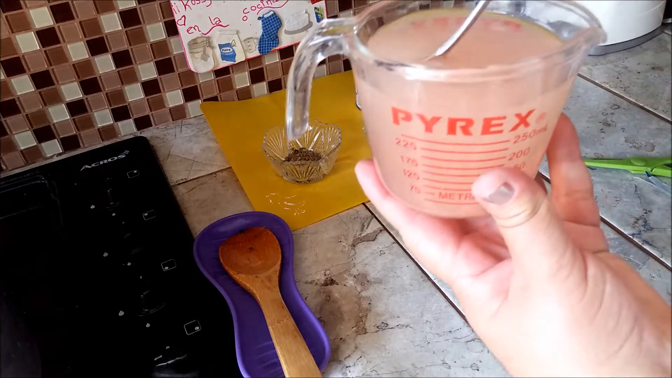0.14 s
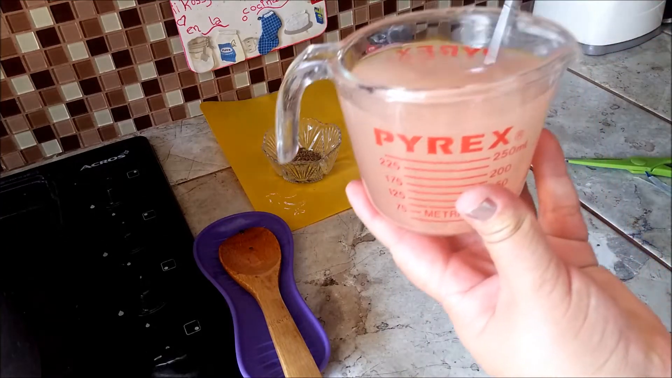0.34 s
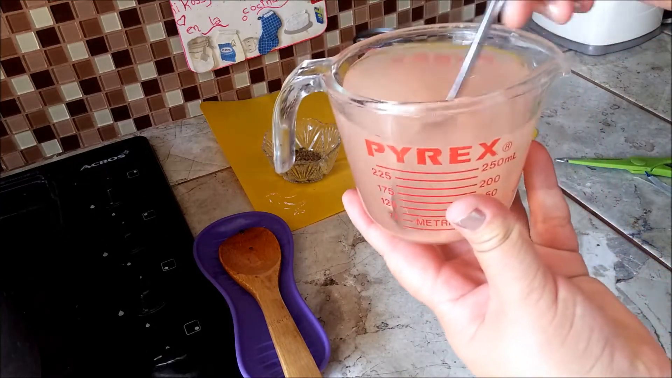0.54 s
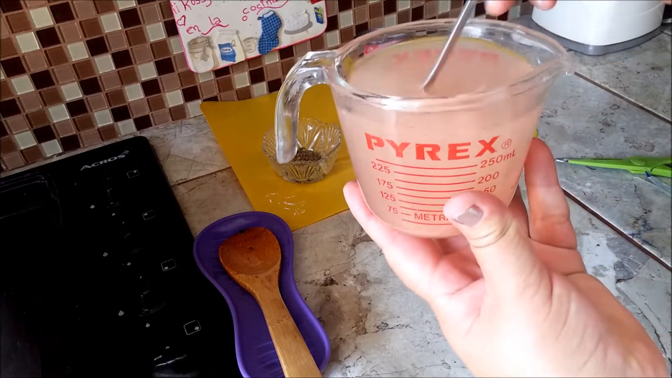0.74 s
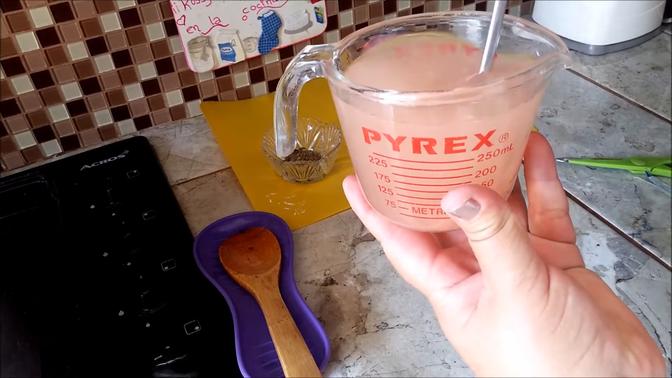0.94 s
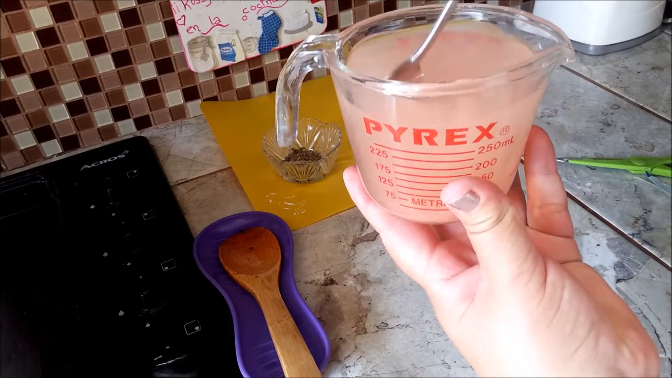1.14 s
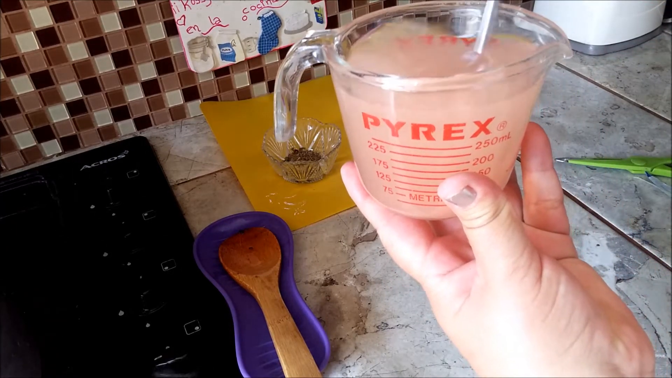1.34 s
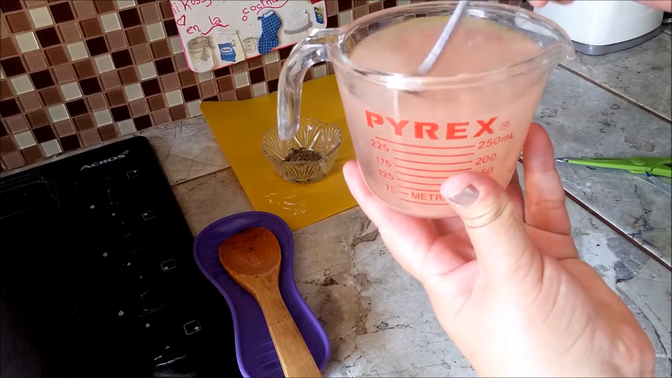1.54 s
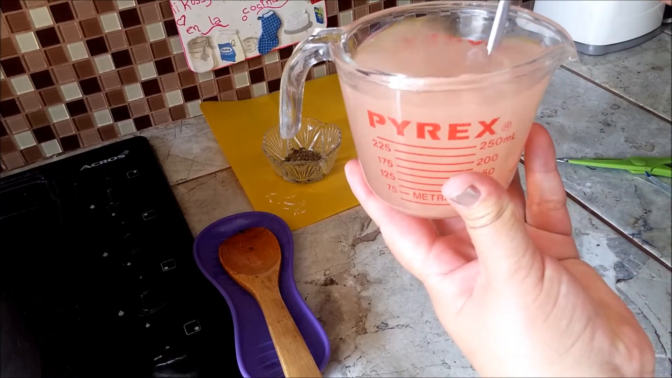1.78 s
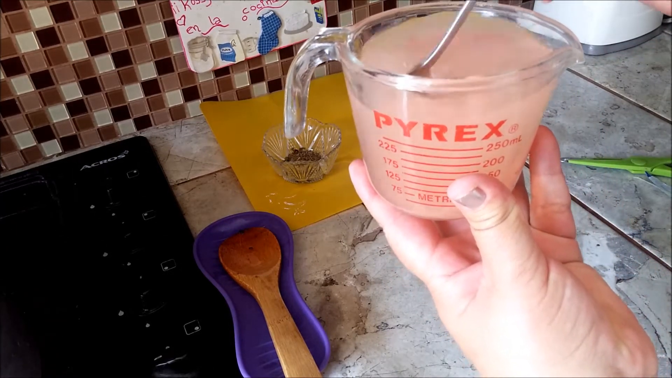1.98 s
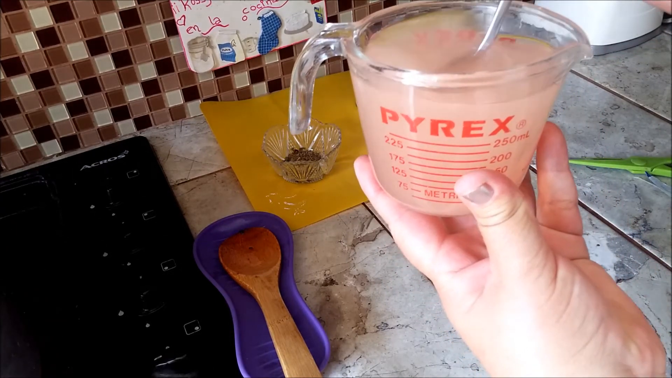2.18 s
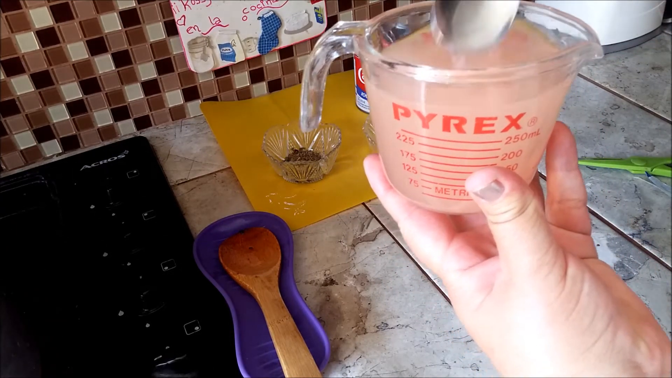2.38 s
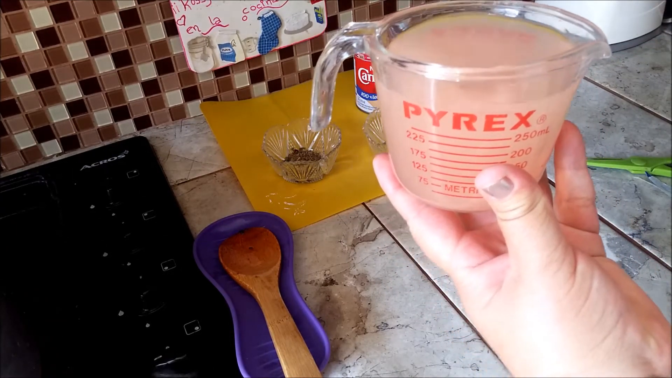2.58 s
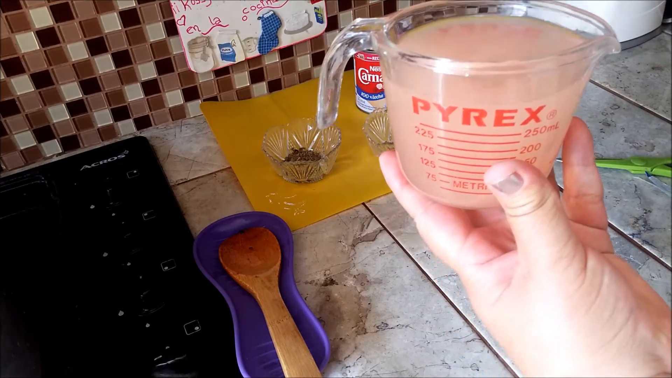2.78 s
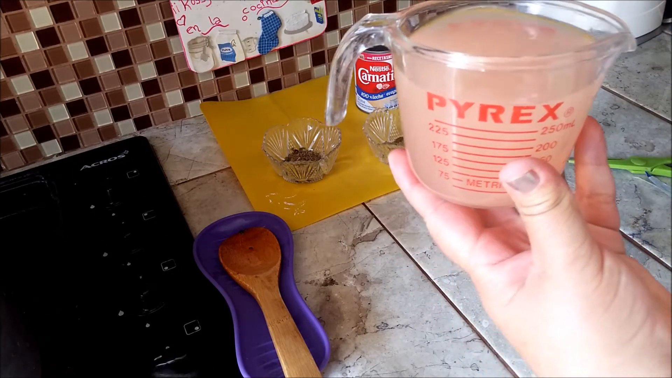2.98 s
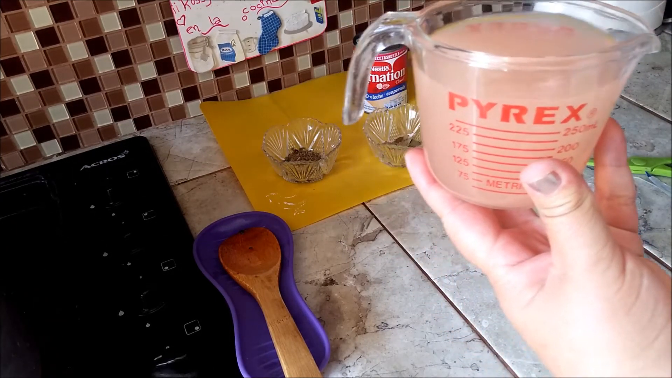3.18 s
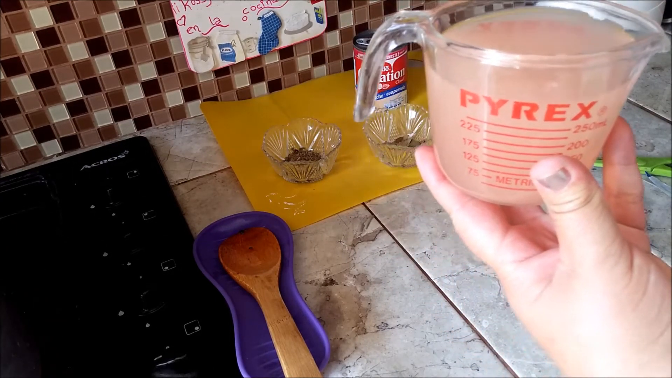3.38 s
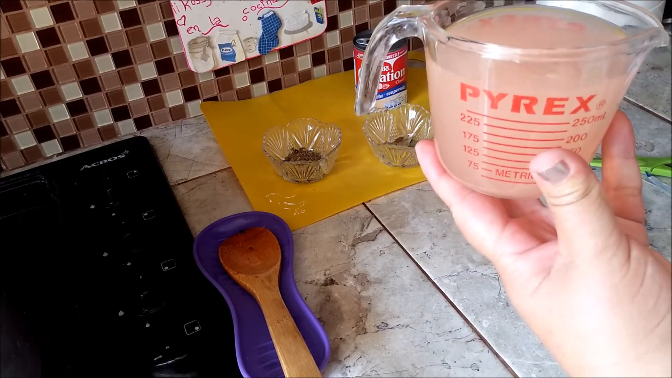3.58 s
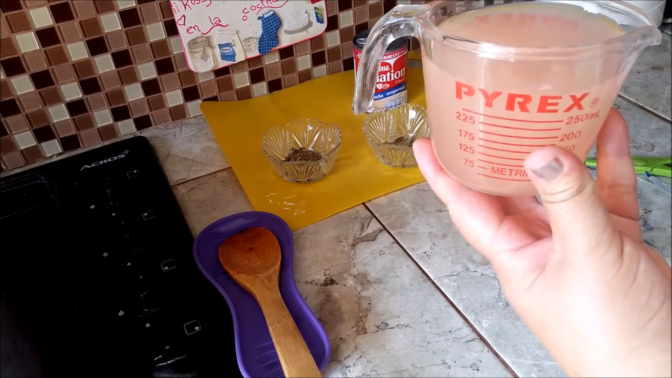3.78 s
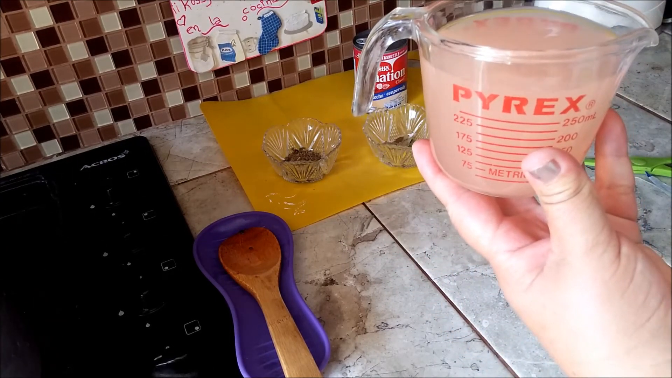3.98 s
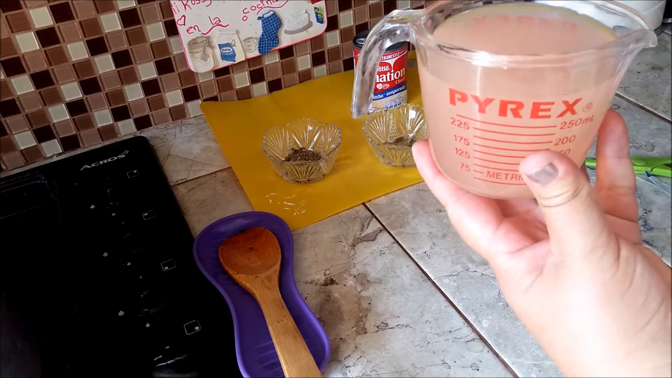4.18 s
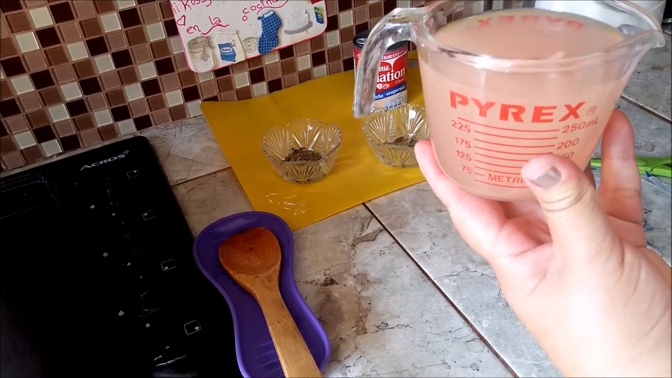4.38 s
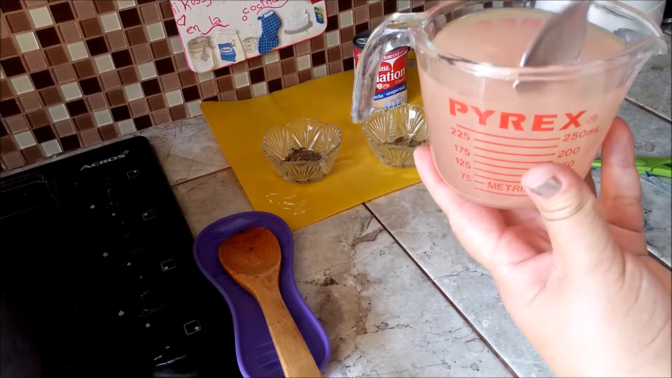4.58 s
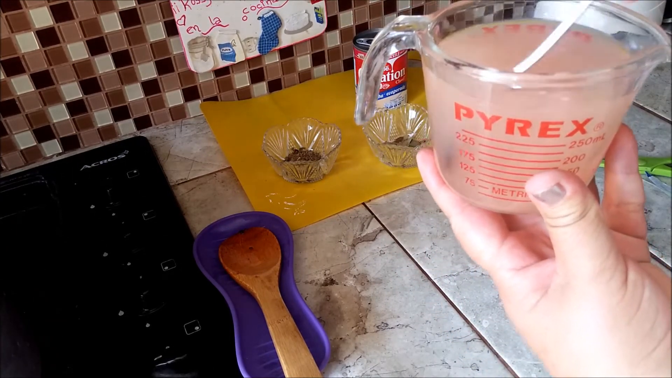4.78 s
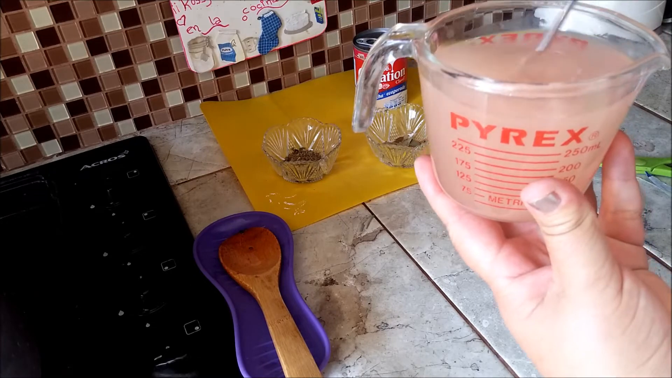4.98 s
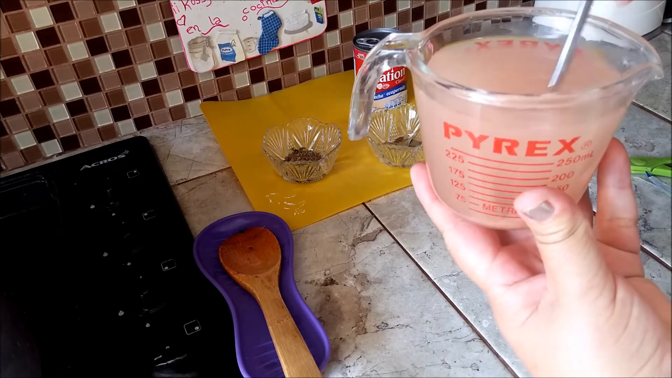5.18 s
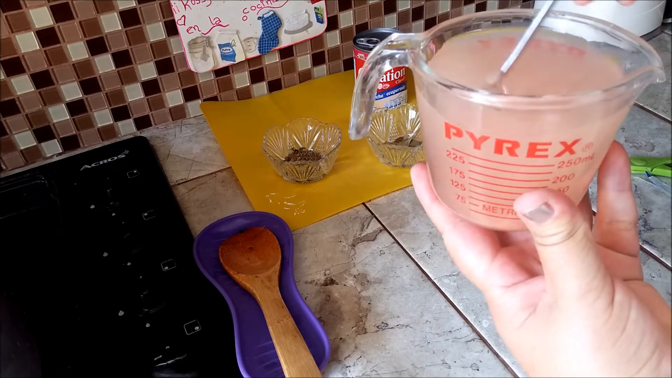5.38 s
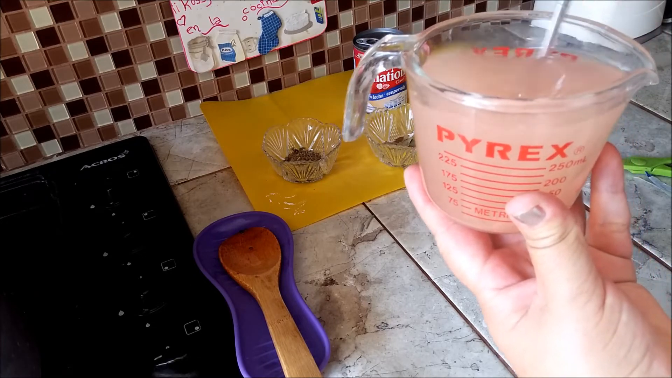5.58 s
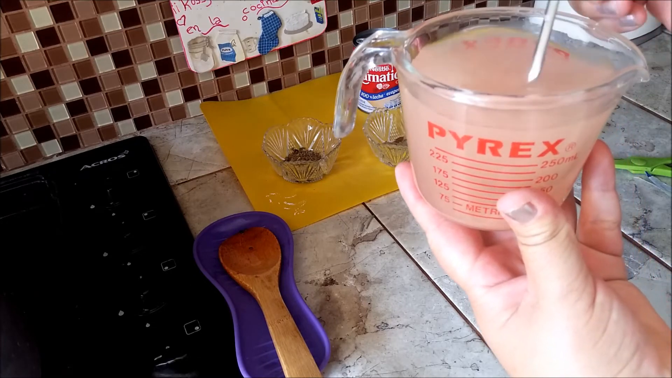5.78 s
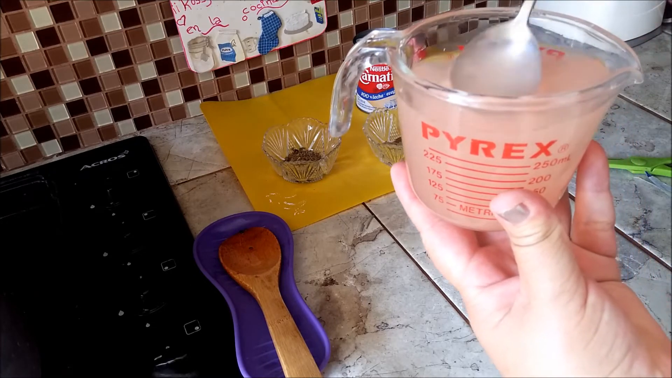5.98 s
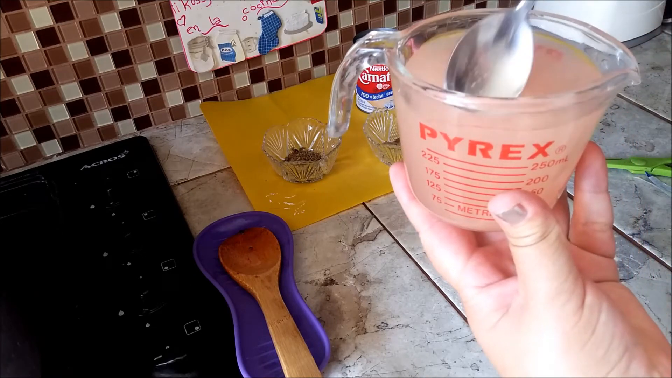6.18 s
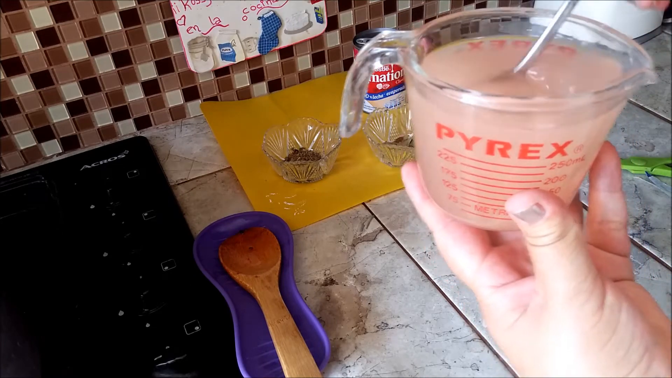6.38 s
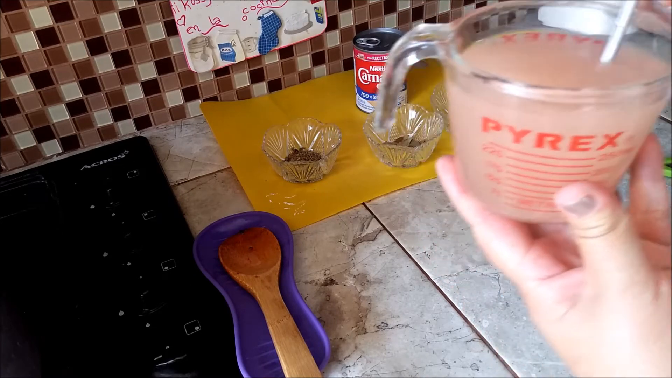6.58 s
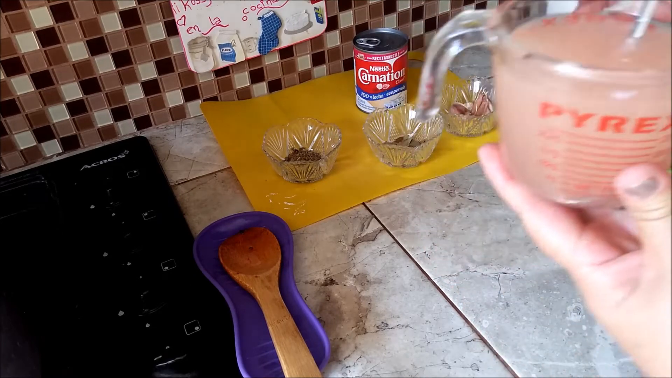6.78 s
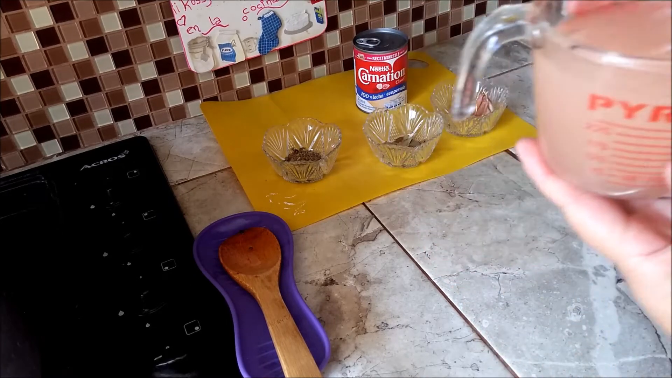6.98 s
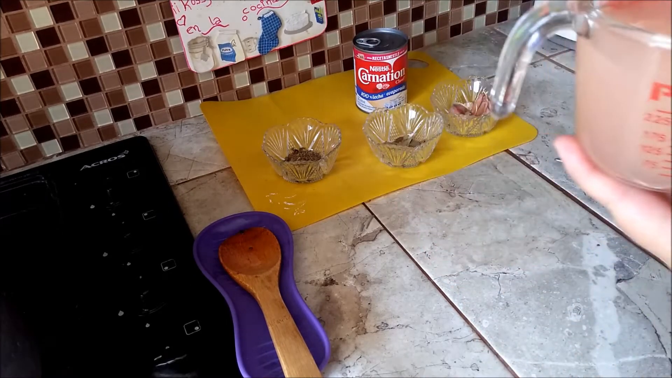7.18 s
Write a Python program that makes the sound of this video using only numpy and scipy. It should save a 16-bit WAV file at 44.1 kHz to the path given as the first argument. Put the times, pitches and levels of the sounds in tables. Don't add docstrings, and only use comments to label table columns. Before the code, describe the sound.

A hand-held glass measuring jug full of creamy liquid is stirred with a steel spoon: about a dozen lively clinks, their pitch sagging slightly as the liquid swirls. Then near quiet with small rising bubble plops, a spell of delicate tapping, another gap, and sharp handle raps on the rim. Steady fridge hum underneath, short tiled-room reflections, close microphone, sound strongly weighted to the right over a dull, hissing left side.

```python
import sys
import numpy as np
from scipy import signal
from scipy.fft import rfft, irfft
from scipy.io import wavfile

SR = 44100
rng = np.random.default_rng(int(sys.argv[2]) if len(sys.argv) > 2 else 0)


def elevation(decibels):
    levels = np.asarray(decibels, float)
    return 10 ** (levels / 20)


def wav_out(sig):
    wavfile.write(sys.argv[1], SR, np.round(np.clip(np.atleast_2d(sig).T, -1, 1) * 32767).astype(np.int16))


N = 319725


def at_time(points, s):
    return np.interp(s, *np.transpose(points))


def at_hz(points, hz):
    table_hz, value = np.transpose(points)
    return np.interp(np.log(hz + 1), np.log(table_hz), value)


def shaped(x, points):
    gain = elevation(at_hz(points, np.fft.rfftfreq(len(x), 1 / SR)))
    return irfft(rfft(x) * gain, len(x))


def bandpass(lo_hz, hi_hz):
    return signal.butter(2, [lo_hz, hi_hz], "band", fs=SR, output="sos")


def add_ring(out, s, modes, rise_s=0.00049):
    at = round(s * SR)
    for hz, db, t60 in modes:
        r, w = elevation(-60 / (t60 * SR)), 2 * np.pi * hz / SR
        blow = signal.unit_impulse(min(N - at, round(t60 * SR)))
        ring = signal.lfilter([0, elevation(db) * np.sin(w)], [1, -2 * r * np.cos(w), r * r], blow)
        out[at:at + len(blow)] += ring * (1 - np.exp(-np.arange(len(blow)) / (rise_s * SR)))


def add_crack(out, s, db, lo_hz, hi_hz, decay_s):
    at, t = round(s * SR), np.arange(3000) / SR
    burst = rng.standard_normal(3000) * np.exp(-t / decay_s) * np.clip(t / 0.00007, 0, 1)
    out[at:at + 3000] += elevation(db) * signal.sosfilt(bandpass(lo_hz, hi_hz), burst)


# [t/s, wall ring f/Hz, lower twin of the first ring level/dB]
SWIRL = [(.038, 3181, -18), (.246, 3154, -3), (.425, 3181, 3), (.563, 3162, 2), (.883, 3140, 0),
         (1.056, 3143, 6), (1.276, 3119, -8), (1.393, 3133, -8), (1.695, 3079, -8), (1.925, 3111, -6),
         (2.088, 3057, 10), (4.83, 3100, -20), (7, 3088, -20)]


def pitch(s):
    times, wall, twin = np.transpose(SWIRL)
    wall_hz = np.interp(s, times, wall)
    shift = wall_hz - 3140
    return wall_hz, 1221 + .22 * shift, 2330 + .6 * shift, np.interp(s, times, twin)


# [t/s, first ring level/dB, wall ring level/dB, dull knock level/dB, bright contact level/dB]
WALL_CLINKS = [(0.0374, -22, -10.5, -34, -22), (0.245, -29, -30.5, -28, -29.5),
               (0.4239, -30, -17, -30, -21.5), (0.562, -55, -18, -34.5, -19),
               (0.7832, -54, -54, -46, -41.5), (.882, -78, -52, -42, -40.5),
               (0.8934, -40.5, -48, -36.5, -30.5), (1.0554, -42.5, -11.5, -34, -17),
               (1.2756, -52, -13.5, -17, -21), (1.3934, -32.5, -24.5, -31, -26.5),
               (1.486, -70, -40, -47, -46), (1.6942, -49, -28, -20.5, -25.5),
               (1.7942, -37, -38, -41.5, -38.5), (1.8686, -40.5, -68, -34.5, -39),
               (1.925, -35.5, -28.5, -35, -21), (2.0881, -55.5, -24, -18, -24)]
# [t/s, first ring level/dB, wall ring level/dB, floor ring level/dB, bright contact level/dB]
FLOOR_CLINKS = [(4.8287, -39.5, -40, -74, -34), (4.8915, -41.5, -29, -35, -34),
                (5.0403, -49, -40.5, -34, -32), (5.2002, -50, -63, -54.5, -64),
                (5.263, -47, -49, -43.5, -44.5), (5.382, -61, -44, -71, -35), (5.463, -45.5, -51, -43, -39),
                (5.5995, -39, -49, -42, -34), (6.553, -52, -46, -38.5, -33.5), (6.6525, -26, -28, -30, -17),
                (6.8393, -69, -43, -55, -51), (6.9987, -55, -34.5, -72, -42.5)]


def clinks():
    on_wall = [(s, first, wall, knock, knock - 43, contact, max(0, contact - knock - 8))
               for s, first, wall, knock, contact in WALL_CLINKS]
    on_floor = [(s, first, wall, floor - 19, floor, contact, 3.0)
                for s, first, wall, floor, contact in FLOOR_CLINKS]
    return on_wall + on_floor


# [t/s, t60/s]
GRIP_T60 = [(0, 0.53), (2.2, 0.7), (4.8, 0.76), (7, 0.63)]


def wall_rings():
    out = np.zeros(N)
    beat_hz, wall_t60 = 4.2, 0.35
    for s, first, wall, _, _, _, sharp in clinks():
        wall_hz, first_hz, _, twin = pitch(s)
        grip_s = at_time(GRIP_T60, s)
        partner = wall - 12 - 4.0 * sharp
        modes = [(first_hz, first - 1, grip_s),
                 (.976 * first_hz, first + twin - 1, grip_s),
                 (wall_hz - beat_hz / 2, wall - 5, wall_t60),
                 (wall_hz + beat_hz / 2, wall - 9, wall_t60),
                 (.982 * wall_hz, wall - 22, .12),
                 (1.143 * wall_hz, partner - 2, 0.46)]
        add_ring(out, s + .0006, modes, rise_s=0.002)
    return out


def knocks():
    out, hits = np.zeros(N), clinks()
    floor_hz = 2046
    for (s, _, _, knock, floor, _, _), luck in zip(hits, rng.normal(0, 1, (len(hits), 3))):
        knock_hz, heavier = pitch(s)[2], max(knock, floor)
        modes = [(knock_hz, knock + 6, 0.051),
                 (knock_hz, knock - 20, .2),
                 (knock_hz * .975, knock - 14.5 + 3 * luck[0], .07),
                 (knock_hz * 1.035, knock - 14 + 3 * luck[1], .06),
                 (floor_hz + 15 * luck[0], floor + 5, 0.1),
                 (floor_hz - 45 + 15 * luck[1], floor - 8.5, 0.1),
                 (1420 + 60 * luck[2], heavier - 17, .05)]
        add_ring(out, s, modes)
        add_crack(out, s, heavier - 4, 600, 2850, 0.006)
    return out


# [t/s, level/dB, f/Hz]
CLACKS = [(4.8914, -40, 3050), (5.0438, -44, 3220), (5.2625, -41.5, 3620), (5.3742, -49, 3140),
          (5.3857, -25.5, 3620), (5.462, -43.5, 2810), (5.852, -50, 3640), (6.5543, -33, 3260),
          (6.6535, -19, 3390), (6.8819, -35.5, 3030), (7, -35, 3480)]


def clacks():
    out = np.zeros(N)
    on_wall = [(s, contact - 11, pitch(s)[0]) for s, *_, contact in WALL_CLINKS]
    on_damped = [(s - .0012, db, hz) for s, db, hz in CLACKS]
    for s, db, hz in on_wall + on_damped:
        add_ring(out, s, [(hz, db + 1.5, .03)])
        add_crack(out, s, db + 8, 2280, 4860, 0.0022)
    return out


# [f/Hz, level/dB, t60/s]
FOUR_KHZ = [(3960, -2, .06), (4150, -7, .13), (4270, -7, .05)]
# [f/Hz, level/dB, t60/s]
FIVE_KHZ = [(5230, 0, .045), (5060, -8, .06), (5290, -18, .15)]
# [f/Hz, level/dB, t60/s]
TICK_MODES = [(6405, -6, 0.06), (7080, -78, 0.0083), (8240, -2.5, 0.031), (9320, -3.5, 0.037),
              (10210, 4, 0.014), (10060, -2, 0.06)]
# [t/s, level/dB, airy edge level/dB]
GRAZES = [(0.9903, -42, -40), (1.1697, -46, -27), (2.7551, -40.5, -60), (3.0344, -59, -56),
          (3.11, -50.5, -57), (4.393, -55, -54), (4.596, -60, -64), (4.634, -59, -38.5), (5.3606, -52, -37),
          (5.372, -35.5, -36), (5.4394, -53, -58), (6.879, -44.5, -40)]


def contact_bursts():
    out = np.zeros(N)
    hits = [(s, contact, contact, max(knock, floor) - contact) for s, _, _, knock, floor, contact, _ in clinks()]
    hits += [(s, db, db - 20, 0) for s, db, _ in GRAZES]
    for (s, tick, body, heavy), luck in zip(hits, rng.normal(0, 1, (len(hits), 2, 12))):
        four = body - 10.5 - 0.34 * np.clip(heavy, -12, 8)
        groups = [(FOUR_KHZ, four), (FIVE_KHZ, body + 0.5), (TICK_MODES, tick + 1.8)]
        modes = [(hz, db + level, t60) for group, level in groups for hz, db, t60 in group]
        varied = [(hz * (1 + hz * 3e-6 * detune), db + 3.5 * share, t60)
                  for (hz, db, t60), detune, share in zip(modes, *luck)]
        add_ring(out, s, varied, rise_s=0.0013)
        add_crack(out, s, body + 0.82, 3780, 6400, 0.01)
        add_crack(out, s, tick + 4, 3700, 9500, 0.0064)
        add_crack(out, s, tick - 7, 5900, 20500, 0.017)
        add_crack(out, s, tick + 9, 8500, 15300, 0.0013)
    for s, _, airy in GRAZES:
        add_crack(out, s, airy + 9, 9600, 16500, 0.003)
    return out


# [t/s, stem ring level/dB, bowl ring level/dB, neck ring level/dB, tip burst level/dB]
SPOON = [(.0365, -32.5, -48, -33, -25), (.2455, -43, -61, -66, -39), (.4238, -25.5, -37, -40, -33),
         (.5623, -38.5, -44.5, -48, -20.5), (.7826, -43, -75, -70, -65), (.8929, -42, -36.5, -46, -24),
         (1.0545, -36.5, -32, -43, -17.5), (1.2755, -30.5, -48, -29, -37), (1.3933, -30, -39.5, -40, -27),
         (1.6942, -31, -49, -55, -31), (1.7948, -76, -38.5, -38, -37), (1.8684, -69, -47, -46, -57),
         (1.925, -33, -32.5, -35, -27.5), (2.0884, -23.5, -37.5, -26.5, -31),
         (4.8287, -52, -67, -56, -32.5), (4.8915, -64, -49, -50, -53), (5.0405, -50, -61, -52, -31.5),
         (5.262, -54, -66, -61, -44), (5.463, -51, -61, -52, -53), (5.5995, -51, -44, -44, -34.5),
         (6.553, -48, -66, -34.5, -28), (6.6525, -27.5, -31, -31, -40), (6.9985, -51, -53, -62, -34)]
# [t/s, f/Hz]
STEM_HZ = [(0, 1732), (2.2, 1728), (5, 1719), (6.7, 1711)]


def spoon_stem():
    out = np.zeros(N)
    for s, stem, bowl, *_ in SPOON:
        hz = at_time(STEM_HZ, s)
        add_ring(out, s + .0006, [(hz, stem - 2, 0.6), (1.204 * hz, bowl, 0.63)], rise_s=0.0027)
    return out


# [t/s, f/Hz]
TIP_HZ = [(0, 5953), (2.2, 6150), (4.8, 5690), (7, 5680)]


def spoon_tip():
    out = np.zeros(N)
    for s, _, _, neck, tip in SPOON:
        hz = at_time(TIP_HZ, s)
        modes = [(hz, tip + 4, .045), (hz * 1.01, tip - 14, .12), (1.54 * pitch(s)[0], neck + 3, 0.086)]
        add_ring(out, s, modes, rise_s=.0007)
    return out


# [t/s, low ring level/dB, upper rings level/dB]
RIM_HITS = [
    (6.554, -28.5, -37),
    (6.653, -25, -16.5),
    (6.842, -43.5, -78),
    (7.0, -45, -70),
    (7.147, -49, -55),
]
# [f/Hz, level/dB, t60/s]
RIM_MODES = [(2864, -14, .06), (3386, 1, .13), (3530, -3, .09), (3700, -10, .05), (3975, -2, .09),
             (4309, -10, .12), (4560, -12, .05), (5042, -5, .2), (5138, -11, .2), (5800, -14, .08)]


def rim():
    out = np.zeros(N)
    for s, low, upper in RIM_HITS:
        add_ring(out, s, [(1921, low, .3)] + [(hz, upper + level, t60) for hz, level, t60 in RIM_MODES])
    return out


# [t/s, level/dB, start f/Hz, rise per s, t60/s]
DROPS = [
    (3.004, -44, 1020, 9.1, 0.039),
    (3.314, -27, 923, 24, 0.041),
    (3.701, -46, 900, 7.5, 0.056),
    (3.906, -40.5, 472, 0.73, 0.12),
    (3.89, -43, 2350, 1, 0.035),
    (4.26, -35, 1030, 7.7, 0.021),
    (5.443, -38.5, 1014, 2.9, 0.18),
    (6.825, -34, 1030, 4.3, 0.019),
    (7.134, -42, 1030, 7.2, 0.035),
]


def drops():
    out, t = np.zeros(N), np.arange(4000) / SR
    for s, db, hz, rise, t60 in DROPS:
        envelope = elevation(db - 60 * t / t60) * np.clip(t / 0.0043, 0, 1)
        out[round(s * SR):][:4000] += envelope * np.sin(2 * np.pi * hz * (t + rise * t * t / 2))
    return out


# [f/Hz, t60/s]
ROOM_T60 = [(500, 0.54), (1000, 0.46), (2000, 0.24), (4000, 0.36), (8000, 0.3), (16000, 0.37)]


def kitchen(x):
    t, tails = np.arange(SR // 2) / SR, 0
    for low in 350 * 2. ** np.arange(6):
        band = bandpass(low, min(2 * low, 20000))
        decay = elevation(-60 * t / at_hz(ROOM_T60, np.sqrt(2) * low))
        tails = tails + signal.sosfilt(band, rng.standard_normal((2, len(t)))) * decay
    tails = tails * np.clip(t / 0.0015, 0, 1)
    tails = tails / np.sqrt(np.sum(tails[0] ** 2))
    return signal.fftconvolve(x[None], tails, axes=1)[:, :N]


def noise(points):
    return shaped(rng.standard_normal(N), points) * np.sqrt(SR / 2)


def drift(rate_hz):
    lowpass = signal.butter(1, rate_hz, fs=SR / 100, output="sos")
    slow = signal.sosfiltfilt(lowpass, rng.standard_normal(N // 100 + 1002))[500:-500]
    return np.interp(np.arange(N) / 100, np.arange(len(slow)), slow / slow.std())


# [f/Hz, rms level/dB]
HUM = [(59.8, -69.5), (240.0, -42), (480.0, -66.5)]
# [f/Hz, level/dB per Hz]
AIR = [(25, -110), (42, -104), (60, -74.5), (82, -99), (108, -82), (140, -90.5), (200, -75.5), (300, -81),
       (460, -80), (650, -90), (1050, -91.5), (1400, -94.5), (2500, -96), (5800, -99)]
# [f/Hz, level/dB]
AIR_TOP = [(6000, 1.5), (7500, -9.5), (10500, -10), (16000, -20.5)]


def fridge():
    t, hum = np.arange(N) / SR, 0
    for hz, db in HUM:
        hum = hum + elevation(db + 0.43 * drift(8.4)) * np.sqrt(2) * np.sin(2 * np.pi * hz * t)
    return hum + shaped(noise(AIR), AIR_TOP) * elevation(.7 * drift(4))


# [f/Hz, level/dB]
JUG_TONE = [(500, -5.5), (1000, 4), (1300, 11.5), (10500, -5), (13000, -3.5), (16000, -20.5)]
# [f/Hz, level/dB]
COVER = [(100, -21), (240, -19), (1200, -23), (1730, -30.5), (2080, -19.5), (2320, -28.5), (3140, -29),
         (3600, -23.5), (5200, -27.5), (8000, -31.5), (14000, -32.5)]
# [f/Hz, level/dB per Hz]
HISS = [(25, -110), (60, -97), (200, -100), (500, -98.5), (1000, -102), (5500, -109), (8000, -120),
        (16000, -125)]


def scene():
    rings = wall_rings() + spoon_stem()
    strikes = knocks() + clacks() + contact_bursts() + spoon_tip()
    blows = shaped(strikes, JUG_TONE) + rim() + drops()
    wet, steady = kitchen(blows + elevation(-9) * rings), fridge()
    jug = blows + rings
    early = np.roll(jug, -12)
    left = shaped(early + elevation(7) * wet[0] + steady, COVER) + noise(HISS)
    right = jug + elevation(-6.5) * wet[1] + steady
    return np.array([left, right])


def roll_off(x):
    return signal.sosfilt(signal.butter(12, 16660, fs=SR, output="sos"), x)


def record(dry):
    rounded = .9 * np.tanh(dry / .9) - .0004
    treble_limit = signal.cheby2(18, 50, 16450, fs=SR, output="sos")
    return roll_off(signal.sosfilt(treble_limit, rounded))


dry = scene()
out = record(dry)
wav_out(out)
```